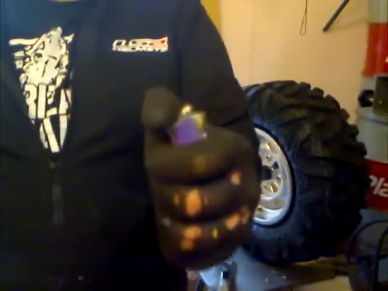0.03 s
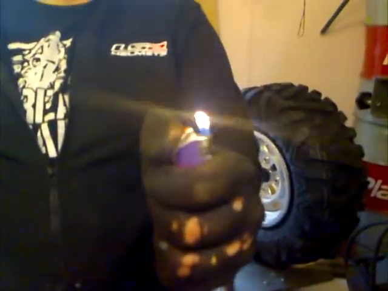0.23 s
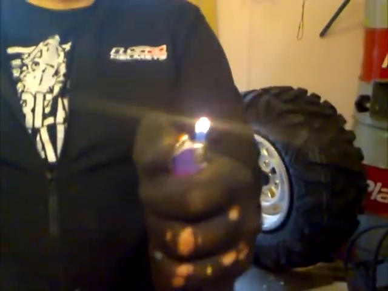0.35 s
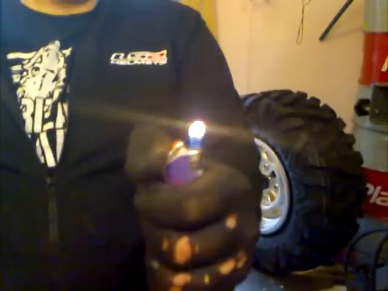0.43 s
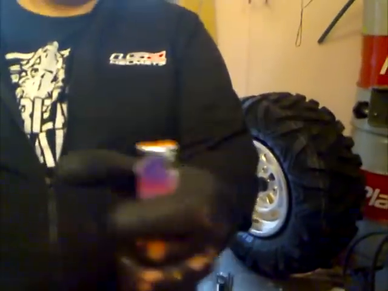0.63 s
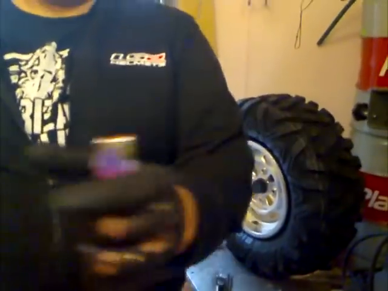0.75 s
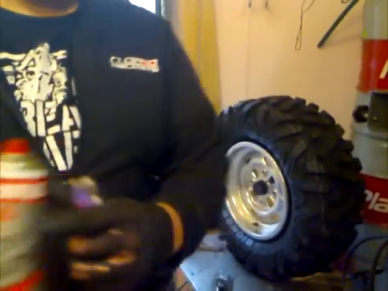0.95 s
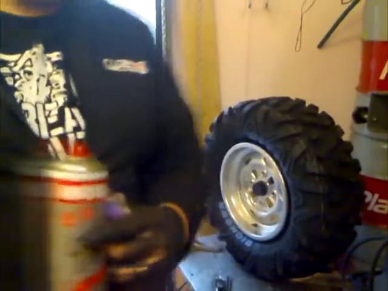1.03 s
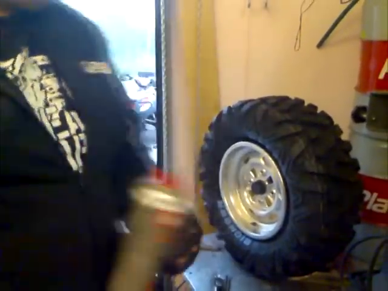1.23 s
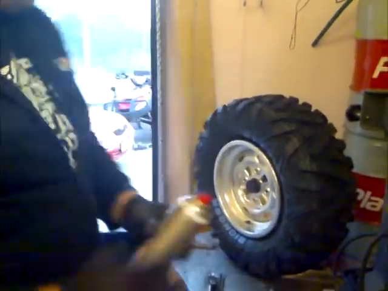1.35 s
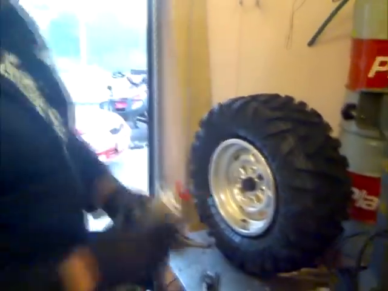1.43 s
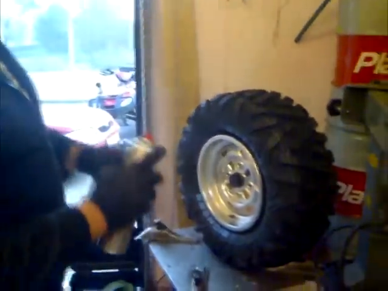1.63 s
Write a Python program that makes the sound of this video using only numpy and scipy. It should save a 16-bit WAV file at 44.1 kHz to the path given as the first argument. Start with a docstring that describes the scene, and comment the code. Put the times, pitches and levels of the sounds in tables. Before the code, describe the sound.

A lighter snaps down at about 0.2 seconds and springs back at 0.6, both clicks sharp, close and slightly overloaded, with a short steel ring and a low reverberation from the workshop walls. At about 1.1 seconds a spray can gives a quieter, damped clink. Faint glove touches brush it between 1.0 and 1.6 seconds. A soft room rumble lies underneath and gradually fades.

```python
"""A hard-walled workshop, one mono microphone close to the hands, over a room rumble that fades.
A lighter snaps twice, pressed and then let go, hard enough to overload the microphone. Each snap is
a chatter of small contacts that rings the steel hood, reverberates and stirs the room's low resonances.
A spray can is then picked up: its wall clinks, and a glove touches it lightly a few times."""
import sys
import numpy as np
from scipy import signal
from scipy.fft import rfft, irfft, next_fast_len
from scipy.io import wavfile
from scipy.ndimage import uniform_filter1d

SR = 44100
rng = np.random.default_rng(int(sys.argv[2]) if len(sys.argv) > 2 else 0)


def transcribe(u):
    """Save the signal u as a 16-bit wav file named by the first command-line argument.

    u: samples, shape (n,) or (channels, n), limited to [-1, 1]; the rate is SR.
    q: integer samples, one column per channel.
    """
    v = np.clip(np.atleast_2d(u).T, -1, 1)
    q = np.round(v * 32767).astype(np.int16)
    wavfile.write(sys.argv[1], SR, q)


N = 74970
CONTACT_ATTACK_S, BUILD_S = 0.00037, 0.0034  # rise of a contact; rise of ringing and reverberation


def amp(db):
    """Decibels to gain."""
    return 10 ** (np.asarray(db) / 20)


def since(start_s):
    """Seconds since start_s, zero before it."""
    return np.maximum(np.arange(N) / SR - start_s, 0)


def blow(start_s, attack_s, t60_s):
    """Envelope that rises at start_s and dies away by 60 dB in t60_s."""
    return (1 - np.exp(-since(start_s) / attack_s)) * amp(-60 * since(start_s) / t60_s)


def along(points, hz):
    """Interpolate (frequency, value) points on a log frequency axis."""
    point_hz, values = np.transpose(points)
    return np.interp(np.log(hz + 1), np.log(point_hz + 1), values)


def filtered(x, response):
    """Shape x by a gain that depends on frequency."""
    size = next_fast_len(N + SR // 2)
    return irfft(rfft(x, size) * response(np.fft.rfftfreq(size, 1 / SR)), size)[:N]


def noise(colour):
    """Coloured noise of rms 1, falling away below the colour's lowest frequency."""
    white = rng.standard_normal(N)
    shaped = filtered(white, lambda hz: amp(along(colour, hz)) * np.minimum(hz / colour[0][0], 1) ** 2)
    return shaped / np.sqrt(np.mean(shaped ** 2) + 1e-20)


def tone(pitch_hz, width_hz):
    """A tone of rms 1, blurred by its wandering phase."""
    drift = np.cumsum(rng.standard_normal(N)) * np.sqrt(np.pi * abs(width_hz) / SR)
    phase = 2 * np.pi * pitch_hz * since(0) + uniform_filter1d(drift, size=600)
    return np.sqrt(2) * np.sin(phase + rng.uniform(0, 2 * np.pi))


def ringing(start_s, modes):
    """Struck metal rings on in slightly unsteady notes."""
    return sum(amp(db) * tone(hz, width_hz=4.9) * blow(start_s, BUILD_S, t60) for hz, db, t60 in modes)


# The workshop's rumble at the microphone: frequency_hz, level_db
RUMBLE_COLOUR = [(15, -54.5), (25, -29), (43, -9), (81, -5.5), (119, 1), (140, -11.5), (161, -8.5),
                 (246, -5), (367, -14.5), (536, -6.5), (617, -12), (1110, -7.5), (1440, -8.5), (1660, -6.5),
                 (2260, -18), (4070, -23), (7000, -34.5), (9100, -57.5), (15400, -120)]
# Narrow tones in the rumble: pitch_hz, width_hz, level_db
HUM_TONES = [(54.2, 10, -15.5), (133.1, 6.3, -12), (910, 12, -11.5), (1150, 14, -16.5)]
# Hiss above it: frequency_hz, level_db
HISS_COLOUR = [(2000, -30), (5000, -5.5), (8000, -3), (12500, 1), (13500, -4.5), (14500, -29.5)]
# The fade of all three: time_s, level_db
ROOM_TONE_FADE = [(0, -39), (.04, -37), (.2, -38.5), (.55, -36), (.8, -43), (1.1, -46), (1.25, -48.5),
                  (1.45, -49), (1.7, -50)]

def room_tone():
    """Rumble, a few wavering tones and hiss, fading together."""
    hum = sum(amp(db) * tone(hz, width) for hz, width, db in HUM_TONES)
    fade = amp(np.interp(since(0), *np.transpose(ROOM_TONE_FADE)))
    return fade * (noise(RUMBLE_COLOUR) + hum + amp(-17) * noise(HISS_COLOUR))


# The glove meets the lighter, later the can: start_s, level_db
TOUCHES = [(.06, -49), (1.013, -42), (1.037, -47.5), (1.213, -44), (1.297, -52), (1.388, -52), (1.572, -55)]
# Its bright brushing sound: frequency_hz, level_db
TOUCH_COLOUR = [(500, -20), (2000, -21), (3500, 1.5), (5000, 1), (7000, -10), (13000, -16), (14500, -50)]

def glove():
    """Each light touch makes a short, soft puff of noise."""
    return sum(amp(db) * noise(TOUCH_COLOUR) * blow(s, attack_s=.002, t60_s=.1) for s, db in TOUCHES)


# Slips just ahead of the snaps and the clink: start_s, level_db
SLIPS = [(0.2252, -23), (0.5735, -34), (0.5804, -25), (1.128, -35)]
# The pressed lighter's body, close up; also colours every slip: frequency_hz, level_db
PRESS_COLOUR = [(120, -39.5), (200, -15), (268, -10), (399, -19), (534, -13.5), (690, -14.5), (992, -10.5),
                (1280, -16.5), (1780, -7.5), (2330, -19), (3960, -4.5), (4330, 0), (4750, -2.5), (6830, -8),
                (7620, -12), (9140, -11), (11000, -21), (14400, -21.5), (15500, -34.5)]

def slips():
    """Parts start to slip with a faint scrape before they strike."""
    return sum(amp(db) * noise(PRESS_COLOUR) * blow(s, CONTACT_ATTACK_S, t60_s=.016) for s, db in SLIPS)


def snap(contacts, colour):
    """A quick chatter of contacts, each a short ring of the lighter's body and a white crack."""
    chatter = np.zeros(N)
    for start_s, level_db in contacts:
        body = noise(colour) * blow(start_s, CONTACT_ATTACK_S, t60_s=.026)
        crack = rng.standard_normal(N) * blow(start_s, CONTACT_ATTACK_S, t60_s=.0084)
        chatter += amp(level_db) * (body + amp(-2.5) * crack)
    return chatter


# Contacts inside the lighter, close to the microphone: start_s, level_db
PRESS_CONTACTS = [(.2275, 1.5), (.2302, -4), (.236, -4), (.2395, -1), (.2445, -8), (.2487, -14)]
# Its steel hood after the press: pitch_hz, level_db, t60_s
PRESS_HOOD_MODES = [(1674, -26.5, .5), (4300, -21.5, 0.42), (4390, -21.5, 0.45), (4530, -25.5, 0.43),
                    (4810, -21.5, 0.482), (4990, -24.5, .55), (5230, -24, 0.48), (5240, -27.5, 0.5),
                    (5480, -25, 0.6)]

def lighter_press():
    """The button snaps down, the hood rings and the walls answer."""
    start_s = PRESS_CONTACTS[0][0]
    direct = snap(PRESS_CONTACTS, PRESS_COLOUR) + ringing(start_s, PRESS_HOOD_MODES)
    return direct + amp(-7.5) * reverberation(start_s, PRESS_COLOUR)


# Decay between the workshop's hard walls: frequency_hz, t60_s
WORKSHOP_DECAY = [(100, 1.3), (500, 1.26), (1000, 1.27), (1800, 0.84), (3000, 0.54), (5000, 0.51),
                  (8000, 0.45), (14000, .42)]

def reverberation(start_s, colour):
    """The workshop answers a blow with a wash of noise whose treble dies first."""
    hz, time_s, spectrum = signal.stft(noise(colour), SR, nperseg=256)
    fade = amp(-60 * np.maximum(time_s - start_s, 0) / along(WORKSHOP_DECAY, hz)[:, None])
    tail = signal.istft(spectrum * fade, SR, nperseg=256)[1][:N]
    return tail * (1 - np.exp(-since(start_s) / BUILD_S))


# Press, release and clink as they stir the low end: start_s, level_db
BLOWS = [(.228, 1), (0.582, -3.5), (1.13, -15)]

def thumps():
    """One soft low push with each blow."""
    pitch_hz, level_db = 45, -32
    return sum(amp(db + level_db) * np.sin(2 * np.pi * pitch_hz * since(s))
               * blow(s, CONTACT_ATTACK_S, t60_s=.12) for s, db in BLOWS)


# The workshop's low resonances: pitch_hz, width_hz, level_db, t60_s
ROOM_MODES = [(55, 14, -35.5, 1.4), (88.7, 25, -35.5, .55), (133.3, 13, -27.5, 1.05),
              (169.9, 50, -34.5, 1.3), (262, 34, -31.5, .55)]

def room_boom():
    """Low room resonances swell after each blow and linger."""
    return sum(amp(blow_db + mode_db) * tone(hz, width) * blow(s, attack_s=.03, t60_s=t60)
               for s, blow_db in BLOWS for hz, width, mode_db, t60 in ROOM_MODES)


# Contacts as the button is let go: start_s, level_db
RELEASE_CONTACTS = [(.5826, -0.5), (.586, -2), (.5908, -9), (.593, -5.5)]
# The release heard directly, close up: frequency_hz, level_db
RELEASE_DIRECT_COLOUR = [(120, -52.5), (200, -20.5), (422, -19.5), (1260, -17), (1450, -18), (1780, -3),
                         (2650, -15), (4030, -5.5), (4750, -8), (6350, 0), (9660, -13.5), (13900, -15),
                         (15500, -20)]
# The release coming back off the walls: frequency_hz, level_db
RELEASE_ROOM_COLOUR = [(120, -34.5), (200, -7.5), (352, -19.5), (564, -10), (715, -13.5), (890, -3.5),
                       (974, -14.5), (1110, -7), (1400, -13.5), (1740, -6), (2330, -16), (2960, -14),
                       (3960, 1.5), (4840, -6.5), (6830, -1.5), (7480, -7), (8980, -10), (14400, -19.5),
                       (15500, -29.5)]
# The steel hood after the release: pitch_hz, level_db, t60_s
RELEASE_HOOD_MODES = [(1823, -24, 0.29), (3850, -30, 0.67), (4012, -28.5, 0.43), (4130, -29, .55),
                      (6490, -30, 0.52), (6730, -29.5, 0.44), (10660, -31.5, 0.28)]

def lighter_release():
    """The button springs back, ringing the hood on other notes, and the walls answer again."""
    start_s = RELEASE_CONTACTS[0][0]
    direct = snap(RELEASE_CONTACTS, RELEASE_DIRECT_COLOUR) + ringing(start_s, RELEASE_HOOD_MODES)
    return direct + amp(-11) * reverberation(start_s, RELEASE_ROOM_COLOUR)


# Two contacts as the can is picked up: start_s, level_db
CLINKS = [(1.1304, -15), (1.1357, -29)]
# The can's wall, held in the hand: pitch_hz, level_db, t60_s
CAN_WALL_MODES = [(899, -12, 0.14), (1070, -2, 0.085), (2777, 0, 0.046), (3377, -8.5, 0.043),
                  (3950, -7, 0.034), (4690, -1.5, 0.032), (5040, -1, 0.046), (5260, 0.5, 0.028),
                  (5520, -11, 0.033), (6080, -27, 0.065), (8333, -25, .04)]
# Its faint lingering notes: pitch_hz, level_db, t60_s
CAN_LINGERING_MODES = [(1086, -38, 0.37), (2756, -46.5, 0.43), (5077, -47, 0.59), (5157, -50, 0.66)]
# The crack of each contact, heard directly: frequency_hz, level_db
CAN_CRACK_COLOUR = [(60, -16), (200, -24), (700, -12), (1400, -15), (1900, 1), (2350, -14), (3100, 3),
                    (4000, -2), (4300, -5), (5100, 2), (6500, -14), (8200, -9), (10000, -22), (13500, -26),
                    (15000, -55)]
# The clink coming back off the workshop's walls: frequency_hz, level_db
CAN_ROOM_COLOUR = [(150, -11.5), (400, -6.5), (800, -0.5), (1100, -1), (1400, -3), (1800, -4),
                   (2300, -11.5), (3500, -7.5), (4400, -12.5), (5100, -2), (6500, -18.5), (8300, -17),
                   (13000, -22), (14500, -55)]

def spray_can():
    """A double clink, damped by the hand, leaves a few faint notes and a little reverberation."""
    first_s = CLINKS[0][0]
    sound = amp(-34) * reverberation(first_s, CAN_ROOM_COLOUR) + ringing(first_s, CAN_LINGERING_MODES)
    for start_s, level_db in CLINKS:
        wall = sum(amp(db) * np.sin(2 * np.pi * hz * since(start_s) + rng.uniform(0, 2 * np.pi))
                   * blow(start_s, CONTACT_ATTACK_S, t60) for hz, db, t60 in CAN_WALL_MODES)
        crack = noise(CAN_CRACK_COLOUR) * blow(start_s, CONTACT_ATTACK_S, t60_s=.04)
        sound += amp(level_db) * (wall + amp(-4) * crack)
    return sound


def scene():
    """Everything reaches one microphone, the same in both channels."""
    mono = (room_tone() + glove() + slips() + lighter_press() + thumps() + room_boom()
            + lighter_release() + spray_can())
    return np.tile(mono, (2, 1))


def record(dry):
    """The microphone clips on the snaps and loses the deepest bass and the highest treble."""
    clip_hardness, bottom_hz, top_hz = 3.7, 32, 15900
    clipped = dry / (1 + np.abs(dry) ** clip_hardness) ** (1 / clip_hardness)
    low_cut = signal.butter(2, bottom_hz, "high", fs=SR, output="sos")
    high_cut = signal.cheby1(12, .1, top_hz, fs=SR, output="sos")

    def response(hz):
        """Gain of both filters, with a steeper edge at the top."""
        band = np.abs(signal.sosfreqz(np.vstack([low_cut, high_cut]), hz, fs=SR)[1])
        return band / (1 + (hz / top_hz) ** 80)

    return np.array([filtered(channel, response) for channel in clipped])


dry = scene()
out = record(dry)
transcribe(out)
```